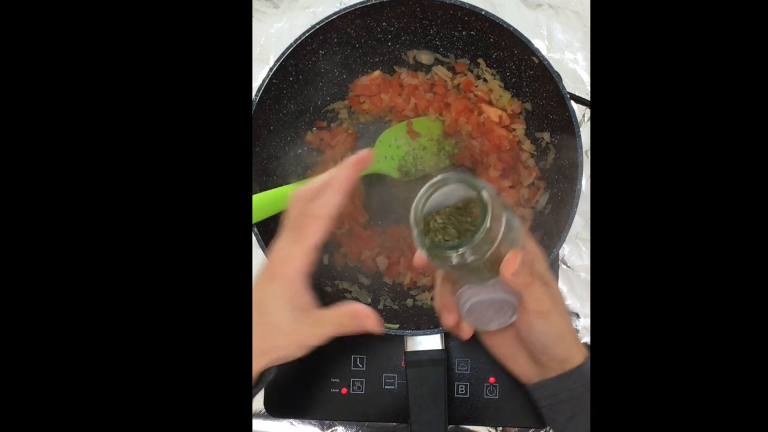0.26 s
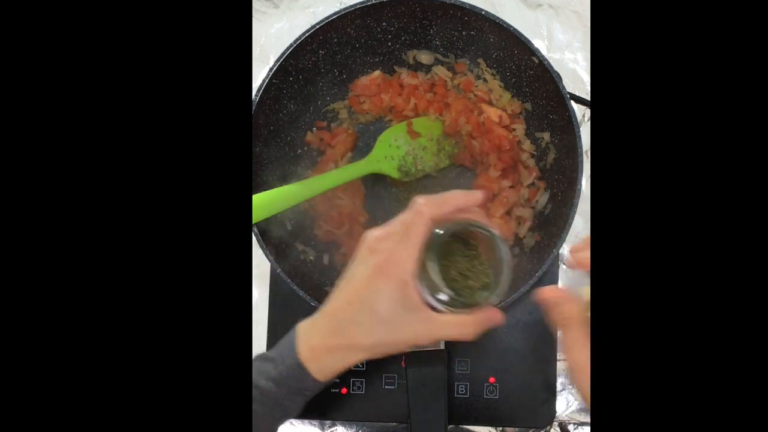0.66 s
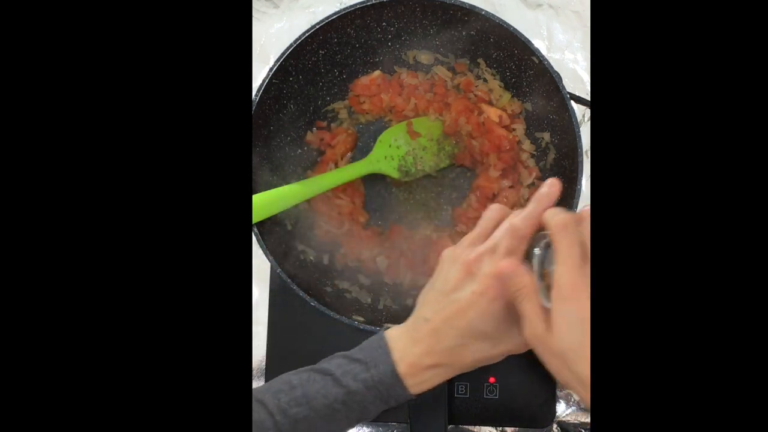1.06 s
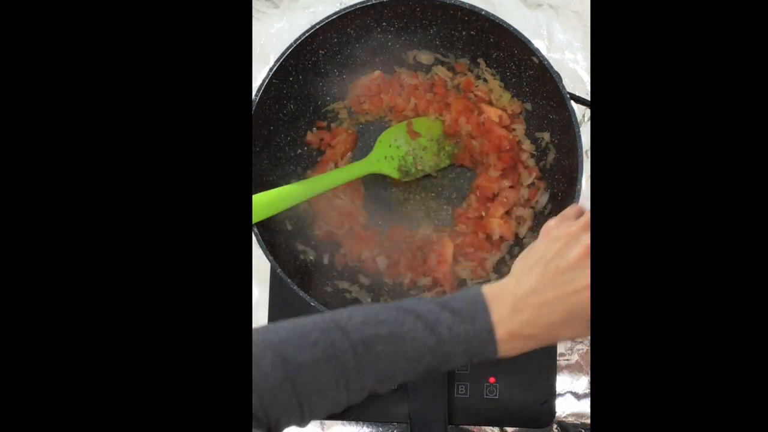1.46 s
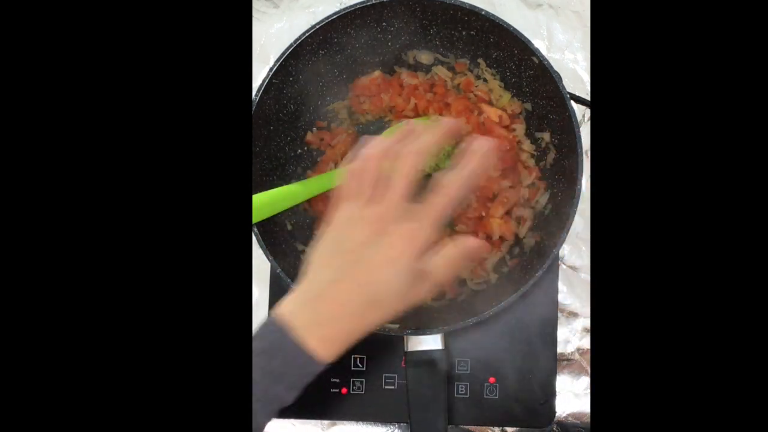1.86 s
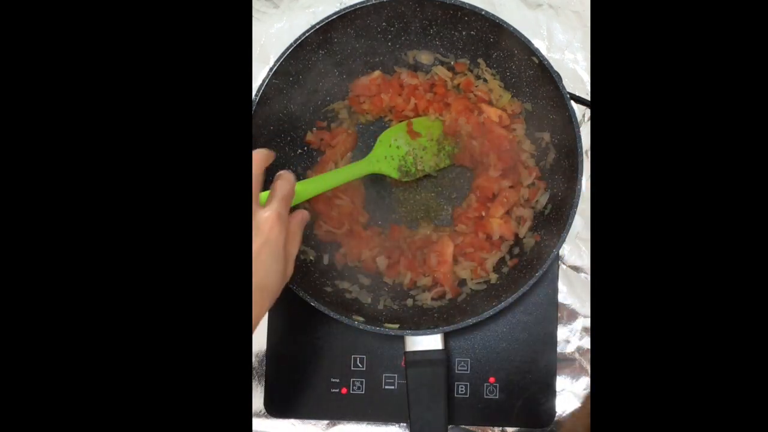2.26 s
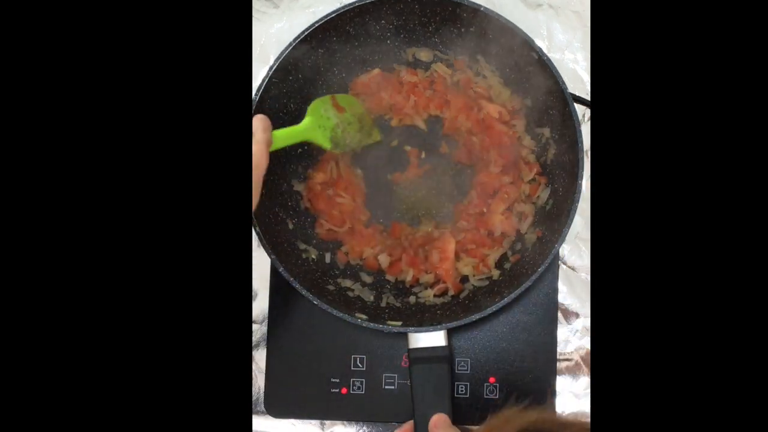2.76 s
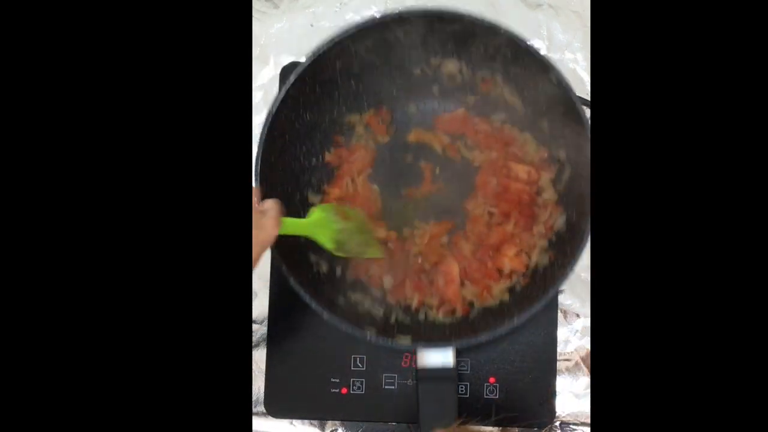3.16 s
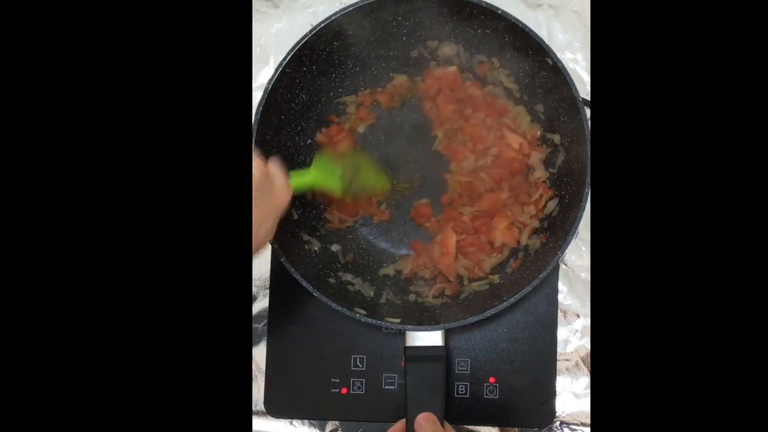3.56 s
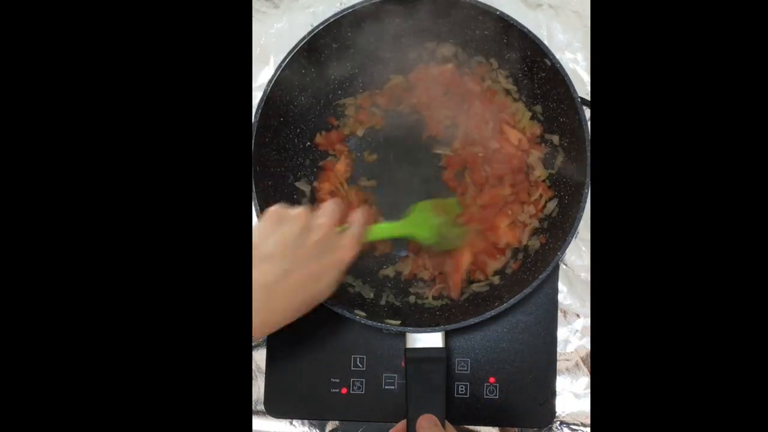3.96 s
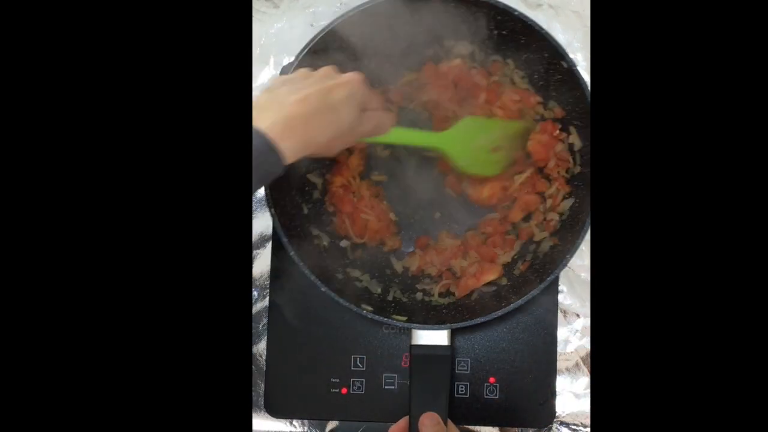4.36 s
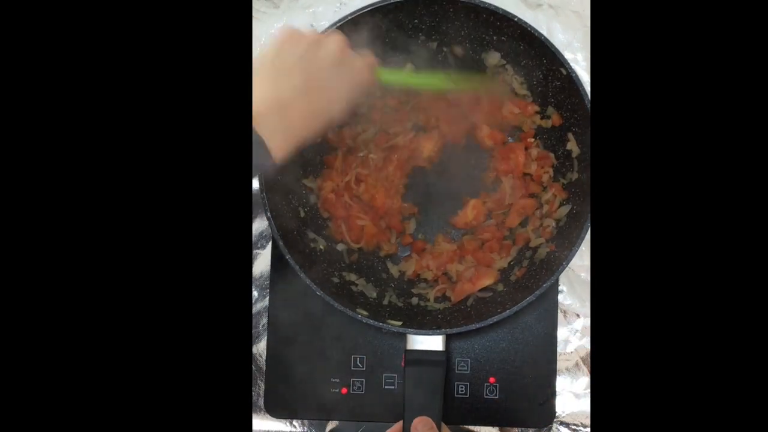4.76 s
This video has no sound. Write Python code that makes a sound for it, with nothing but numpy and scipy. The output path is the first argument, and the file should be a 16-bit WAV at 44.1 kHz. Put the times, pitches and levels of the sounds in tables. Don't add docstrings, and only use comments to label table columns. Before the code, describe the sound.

Steady low fan and soft simmering open the scene, with tiny pan taps. A small lid click comes first, then a loud foil crunch with glassy rattle, then quick clinks and a hard counter thud. Rapid hollow pan knocks and low sliding follow, then crackling, spitting sizzle. One close microphone in a small kitchen; background hiss is slightly patchy and dips after blows.

```python
import sys
import numpy as np
from scipy import signal
from scipy.io import wavfile
from scipy.ndimage import uniform_filter1d

SR = 44100
rng = np.random.default_rng(int(sys.argv[2]) if len(sys.argv) > 2 else 0)


def gain_from_decibels(decibels):
    exponent = np.asarray(decibels, float) / 20
    return 10 ** exponent


def log_audio(samples):
    frames = np.atleast_2d(samples).T
    limited = np.clip(frames, -1, 1)
    pcm = np.round(limited * 32767).astype(np.int16)
    wavfile.write(sys.argv[1], SR, pcm)


N = 221273
T = np.arange(N) / SR

# (frequency [Hz], density [dB per Hz])
ROOM_SPECTRUM = [(18, -46.5), (30, -15), (90, -9.5), (134, -13.5), (238, -13.5), (371, 3), (733, -10),
                 (1340, -3.5), (1650, -16.5), (2090, -0.5), (2260, -11), (2940, -8.5), (4350, -8),
                 (12700, -13), (15700, -18)]
# (frequency [Hz], level [dB rms])
FAN_TONES = [(68.5, -75.5), (137, -71.5), (206, -72.5), (274, -77)]
# (time [s], level [dB])
FAN_LOAD = [
    (0, 10.5),
    (1, 9.5),
    (2, 5.5),
    (2.6, 1),
    (3.6, -4.5),
    (5.02, 3),
]
# (time [s], level [dB])
SIMMER_LEVEL = [
    (0, -68.5),
    (1.6, -67.5),
    (2.8, -57.5),
    (3.1, -50),
    (3.5, -69),
    (4.5, -63),
    (5.02, -62.5),
]
# (frequency [Hz], level [dB], t60 [s])
PAN_MODES = [(162, -28.5, 0.14), (260, -15.5, 0.071), (368.6, -0.5, 0.062), (420.4, -1, 0.051),
             (610, -16, 0.03), (813, -23, 0.027)]
# (time [s], peak [dB], low side [dB])
PAN_ROCKS = [(0.123, -49, -23), (0.209, -48.5, -12), (0.431, -41, -26), (0.519, -44.5, -20),
             (2.815, -12.5, -27), (2.849, -31.5, -2), (2.874, -17.5, -32), (2.899, -21.5, -10),
             (2.924, -25, -21), (2.939, -28, 0.5), (2.967, -15, -33), (2.994, -25, -26), (3.027, -24, -11),
             (3.054, -22, -33), (3.079, -32.5, -8), (3.173, -32, -16), (3.244, -24, -31), (3.264, -25, -30),
             (3.309, -32.5, -24), (3.357, -38, -20), (3.441, -49.5, -1), (3.489, -42, -11)]
# (peak time [s], level [dB], release [s])
PAN_SHOVES = [
    (2.835, -51.5, 0.076),
    (2.9, -54, 0.055),
    (2.978, -37, 0.028),
    (3.04, -46.5, 0.052),
    (3.15, -51, 0.066),
    (3.2, -46.5, 0.056),
    (3.234, -44.5, 0.032),
    (3.3, -65, .04),
    (3.49, -54.5, 0.069),
]
# (frequency [Hz], level [dB], t60 [s])
LID_MODES = [(391.5, -1, 0.2), (522, -6, .07), (2290, -2.5, 0.058), (2886, -3, .08), (3140, 1, 0.12),
             (3350, 2, .09), (4900, -18, 0.028)]
# (frequency [Hz], density [dB per Hz])
LID_SPECTRUM = [(88, -60), (150, -27), (247, -14), (381, -6.5), (1350, -12.5), (3200, -6), (3720, -37.5),
                (5100, -43), (7360, -60), (8000, -39), (10400, -69), (17600, -120)]
# (frequency [Hz], density [dB per Hz])
FOIL_SPECTRUM = [(35, -60), (60, -27), (738, -6.5), (869, -7), (1120, -7), (1260, -6.5), (1630, -5.5),
                 (1960, -4), (4220, -1), (4740, -6), (7200, -1), (14500, -26), (15500, -32)]
# (frequency [Hz], t60 [s])
FOIL_T60 = [(100, 0.4), (700, 0.31), (3000, 0.3), (6000, 0.19), (10000, 0.21), (14000, 0.16)]
# (frequency [Hz], level [dB], t60 [s])
JAR_MODES = [(873.5, -16.5, 0.14), (2335, -10.5, .07), (3546, -8, 0.088), (4290, -11, 0.056),
             (7060, -4.5, 0.063), (7200, -5, .08), (7153, -3.5, .09), (7280, -7, 0.058), (8980, -9, 0.053),
             (14500, -14, .03)]
# (frequency [Hz], level [dB], t60 [s])
GLASS_MODES = [(920, -15.5, .1), (983, -13.5, 0.07), (1250, -8.5, .1), (1760, 3.5, .2), (1791, 2.5, 0.77),
               (2950, -2, 0.44), (4150, -15, .07), (4657, -2.5, 0.27), (4962, -1, 0.2), (5420, 1.5, 0.099),
               (5980, -6.5, .27), (7110, -5, 0.077), (8720, 0.5, 0.089), (8900, -7.5, 0.16),
               (11300, -17, .1), (11900, -10.5, 0.073), (12100, -11.5, .09), (12540, -17.5, .06),
               (13870, -27, .05), (15430, -13, .12)]
# (time [s], lower modes [dB], upper modes [dB], favoured upper mode [Hz])
GLASS_CLINKS = [
    (2.0772, -26, -22, 11800),
    (2.082, -14, -22, 15400),
    (2.101, -36, -31, 7100),
    (2.11773, -20, -37.5, 12000),
    (2.144, -38.5, -27.5, 5980),
    (2.15347, -19.5, -34.5, 8800),
    (2.128, -40, -31, 12600),
]
# (frequency [Hz], density [dB per Hz])
RATTLE_SPECTRUM = [(150, -6.5), (400, -7.5), (1200, 6.5), (5000, -7.5), (9000, -20), (15000, -30.5)]
# (frequency [Hz], level [dB], t60 [s])
COUNTER_MODES = [(210.8, -9.5, .35), (363.4, -6, 0.15), (499.4, -15.5, .15), (525, -11, .22),
                 (560, 8.5, 0.032), (562, -12, 0.2494), (860.7, -12, 0.46), (921, -16.5, 0.22),
                 (978, -16, 0.26), (1128, -16, 0.19), (1584, -14.5, 0.11)]
# (time [s], level [dB])
COUNTER_BLOWS = [
    (2.168, -21.5),
    (2.1791, -12),
    (2.181, -1.5),
    (2.194, -20),
    (2.207, -13.5),
    (2.221, -20),
]
# (frequency [Hz], density [dB per Hz])
THUMP_SPECTRUM = [(18, -80.5), (30, -46.5), (202, -2.5), (359, 0), (433, -16.5), (539, 1), (769, -2.5),
                  (865, -2), (1340, -14.5), (1700, 3.5), (2210, -18), (3740, -120)]
# (frequency [Hz], t60 [s])
THUMP_T60 = [(40, .3), (150, .45), (500, 0.46), (1500, 0.4)]
# (time [s], peak [dB], chirp [Hz])
SPITS = [
    (2.5773, -33, 6900),
    (2.6514, -23, 9750),
    (3.0746, -33, 7110),
    (3.5002, -18, 12700),
    (3.582, -28, 8120),
    (3.6472, -11, 11100),
    (3.9023, -34.5, 7060),
    (3.9314, -26, 5820),
    (4.3442, -24.5, 11100),
    (4.91, -24.5, 6400),
]
# (frequency [Hz], density [dB per Hz])
SIZZLE_SPECTRUM = [(410, -25.5), (700, -22), (1340, -13), (1670, -8.5), (2030, -12), (2350, -2),
                   (2930, -10), (3380, -2.5), (5060, -5.5), (5690, -2.5), (7380, -2.5), (11000, -4),
                   (15700, -6)]
# (time [s], level [dB], tilt [dB per octave])
FRYING = [(0, -56.5, -2.5), (1.3, -55.5, -1.5), (1.6, -52.5, -3.5), (1.85, -52, -3.5), (2.06, -60.5, -3.5),
          (2.4, -56.5, -5), (2.6, -51, -2), (3.0, -53, -3), (3.1, -42, -0.5), (3.38, -41, -1),
          (3.62, -36.5, 0.5), (3.76, -37, -1), (3.88, -59, -1.5), (3.94, -44.5, -1), (4.12, -43, -2.5),
          (4.5, -43, -3), (4.66, -39, -2.5), (5.02, -42.5, -4)]
# (peak time [s], level [dB], release [s], centre [Hz])
FLARES = [(1.72, -48, .06, 11040), (2.65, -46, .02, 10000), (2.9, -48.5, 0.033, 7000),
          (3.17, -34, 0.034, 2320), (3.24, -38, .05, 6950), (3.3, -37, .04, 4520), (3.46, -30, 0.033, 1700),
          (3.5, -32, 0.066, 12370), (3.66, -34, 0.033, 6910), (3.66, -32, 0.064, 4280),
          (3.735, -29, 0.058, 3600), (3.71, -30.5, 0.045, 12000), (3.968, -22, 0.061, 11200),
          (3.955, -25.5, 0.05, 6470), (4.0, -32, 0.091, 2340), (4.02, -31, 0.073, 10400),
          (4.075, -32, 0.037, 5800), (4.37, -39.5, 0.1, 12000), (4.66, -37.5, 0.097, 4530),
          (4.78, -33.5, 0.14, 4200), (4.95, -35.5, 0.078, 5850)]
# (frequency [Hz], width [Hz], level, not used [dB])
WALL_MODES = [(1693, 36, -8), (4520, 190, -5), (5810, 53, -4), (6470, 56, -6), (8040, 29, -6),
              (9570, 630, -4), (10880, 63, -3), (11380, 53, 0), (12700, 79, -2), (12500, 67, -3),
              (12700, 39, -4), (13830, 140, -8)]


def rms_one(x):
    return x / np.sqrt(np.mean(x ** 2) + 1e-20)


def in_time(rows):
    s, *columns = np.transpose(rows)
    return [np.interp(T, s, c) for c in columns]


def at_hz(points, hz):
    table_hz, values = np.transpose(points)
    return np.interp(np.log(hz), np.log(table_hz), values)


def drift(rate_hz):
    r = np.exp(-80 * np.pi * rate_hz / SR)
    white = rng.standard_normal(N // 40 + 2002)
    slow = signal.lfilter([1], [1, -2 * r, r * r], white)[2000:]
    return np.interp(np.arange(N) / 40, np.arange(len(slow)), rms_one(slow))


def ring(clicks, hz, t60_s, rise_s=1e-4):
    w, touched = 2 * np.pi * hz / SR, np.flatnonzero(clicks)
    span = slice(touched[0], touched[-1] + 3 * SR // 4)
    r, quick = gain_from_decibels(-60 / (t60_s * SR)), np.exp(-1 / (rise_s * SR))
    push = signal.lfilter([1, 0, -1], [1], clicks[span]) + 1e-18
    swell = signal.lfilter([(1 - quick ** 2) / 2], [1, -2 * quick * np.cos(w), quick ** 2], push)
    out = np.zeros(N)
    out[span] = signal.lfilter([0, np.sin(w)], [1, -2 * r * np.cos(w), r * r], swell)
    return out


def clicks_at(times_s, db):
    out = np.zeros(N)
    out[np.round(np.asarray(times_s) * SR).astype(int)] = gain_from_decibels(np.asarray(db))
    return out


def strike(clicks, modes, rise_s):
    out = 0
    for k, (hz, db, t60_s) in enumerate(modes):
        out = out + (-1) ** k * gain_from_decibels(db) * ring(clicks, hz, t60_s, rise_s)
    return out


def bands(spectrum, white, count):
    edges = np.geomspace(spectrum[0][0], 1.05 * spectrum[-1][0], count + 1)
    hz = np.sqrt(edges[1:] * edges[:-1])
    gain = gain_from_decibels(at_hz(spectrum, hz))
    gain = gain / np.sqrt(2 * np.sum(gain ** 2 * np.diff(edges)) / SR)
    for k in range(count):
        band_pass = signal.butter(2, edges[k:k + 2], "band", fs=SR, output="sos")
        yield hz[k], gain[k] * signal.sosfilt(band_pass, white[k % 2])


def grains(per_s, spread_db, size=N):
    uneven_db = spread_db * np.minimum(rng.exponential(1, (2, size)), 5)
    ticks = gain_from_decibels(uneven_db) * rng.choice([-1, 1], (2, size))
    return rms_one(ticks * (rng.random((2, size)) < per_s / SR))


def burst(start_s, rise_s, db, spectrum, t60s, per_s, spread_db):
    out, t, first = np.zeros(N), T[:SR // 2], round(start_s * SR)
    swell = np.clip(t / rise_s, 0, 1) ** 2
    for hz, band in bands(spectrum, grains(per_s, spread_db, size=len(t)), count=20):
        fall_db = 60 * np.maximum(t - rise_s, 0) / at_hz(t60s, hz)
        out[first:first + len(t)] += gain_from_decibels(db - fall_db) * swell * band
    return out


def swells(peak_s, db, release_s, rise, t):
    x = (t - peak_s[:, None]) / release_s[:, None]
    return gain_from_decibels(db)[:, None] * np.exp(-np.where(x < 0, (x / rise) ** 2, x))


def kitchen(x, db, t60_s):
    t = T[:SR // 3]
    tail = rng.standard_normal(len(t)) * gain_from_decibels(-60 * t / t60_s) * (t > 0.003)
    return x + gain_from_decibels(db) * signal.fftconvolve(x, tail / np.sqrt(np.sum(tail ** 2)))[:N]


def by_bin(x, gain_for):
    spec = signal.stft(x, nperseg=1024, noverlap=768)[2]
    power = uniform_filter1d(np.abs(spec) ** 2, size=3, axis=-1) + 1e-16
    return signal.istft(spec * gain_for(power), nperseg=1024, noverlap=768)[1][..., :N]


def cut_tail(x, knee_db):
    return by_bin(x, lambda power: power ** 2 / (power ** 2 + gain_from_decibels(knee_db) ** 4))


def suppress(x, depth_db=-4.0, strength=0.6, memory_s=0.23):
    r = np.exp(-256 / SR / memory_s)

    def gain(power):
        start = np.log(power[..., :40]).mean(axis=-1, keepdims=True)
        recent = np.exp(start + signal.lfilter([1 - r], [1, -r], np.log(power) - start))
        return np.maximum(1 - strength * recent / power, gain_from_decibels(depth_db))
    return by_bin(x, gain)


def hob_fan():
    load_db = in_time(FAN_LOAD)[0]
    hiss = 0
    for hz, band in bands(ROOM_SPECTRUM, rng.standard_normal((2, N)), count=24):
        hiss = hiss + band * gain_from_decibels(2.4 * drift(6.5) + 0.45 * load_db * (hz < 180))
    tones = sum(gain_from_decibels(db + 1.1 * drift(3.0)) * np.sin(2 * np.pi * hz * T) for hz, db in FAN_TONES)
    return gain_from_decibels(-53.0) * hiss + gain_from_decibels(load_db - 3.0) * tones


def simmer():
    bubbles = grains(60.0, spread_db=2.5)[0]
    return rms_one(strike(bubbles, PAN_MODES[1:4], rise_s=0.0044)) * gain_from_decibels(in_time(SIMMER_LEVEL)[0])


def pan_rocking():
    s, db, low_db = np.transpose(PAN_ROCKS)
    taps = strike(clicks_at(s, db - 1.5), PAN_MODES[2:], rise_s=0.0012)
    low_pushes = strike(clicks_at(s, db + low_db + 17.0), PAN_MODES[:2], rise_s=0.0034)
    return kitchen(taps + low_pushes, db=-5, t60_s=0.14)


def pan_sliding():
    low_band = signal.butter(3, [60, 200], "band", fs=SR, output="sos")
    rumble = signal.sosfilt(low_band, rng.standard_normal(N))
    return rms_one(rumble) * swells(*np.transpose(PAN_SHOVES), 0.25, T).sum(axis=0)


def lid():
    snap = strike(clicks_at([0.8800, 0.8817, 0.886], [-38, -24, -32]), LID_MODES, rise_s=0.00055)
    return snap + burst(0.880, 0.0032, -30.0, LID_SPECTRUM, [(300, 0.24), (3000, 0.16)], 8000.0, spread_db=2.5)


def jar():
    jolts = grains(1500.0, spread_db=2.2)[0]
    shake_db = -36 - 60 * np.maximum(T - 1.384, 0) / 0.27
    shake = jolts * (T > 1.384) * (T < 1.7) * gain_from_decibels(shake_db)
    crunch = burst(1.370, 0.019, -10, FOIL_SPECTRUM, FOIL_T60, 9000.0, spread_db=2.5)
    return crunch + strike(shake + clicks_at([1.387], [-26]), JAR_MODES, rise_s=0.00081)


def glass():
    s, lower_db, upper_db, spot_hz = np.transpose(GLASS_CLINKS)
    favour_db, favour_octaves = 11.5, 0.037
    rings = 0
    for hz, mode_db, t60_s in GLASS_MODES:
        touch_db = lower_db
        if hz > 4000:
            touch_db = upper_db + favour_db * np.exp(-(np.log2(hz / spot_hz) / favour_octaves) ** 2)
        rings = rings + gain_from_decibels(mode_db) * ring(clicks_at(s, touch_db), hz, t60_s, rise_s=0.00077)
    rings = cut_tail(kitchen(rings, db=-11, t60_s=0.2), knee_db=-45.5)
    return rings + burst(2.075, 0.008, -21.5, RATTLE_SPECTRUM, [(500, 0.38), (8000, 0.28)], 6600.0, spread_db=3.0)


def thump():
    s, db = np.transpose(COUNTER_BLOWS)
    knock = strike(clicks_at(s, db - 2.5), COUNTER_MODES, rise_s=0.00079)
    contact = ring(clicks_at(s, db - 3.5), 1500.0, t60_s=0.0066)
    return knock + contact + burst(2.179, 0.004, -13.5, THUMP_SPECTRUM, THUMP_T60, 2500.0, spread_db=2.0)


def spits():
    return sum(ring(clicks_at([s], [db - 0.5]), hz, 60.0 / hz, rise_s=0.0006) for s, db, hz in SPITS)


def sizzle(db=-0.15, patchy_db=3.5, flutter_db=0.29):
    out, shared, t = 0, drift(34.0), T[::64]
    level_db, tilt_db = (c[::64] for c in in_time(FRYING))
    s, flare_db, release_s, centre_hz = np.transpose(FLARES)
    flare_power = swells(s, flare_db, release_s, 0.62, t) ** 2
    for hz, band in bands(SIZZLE_SPECTRUM, grains(12000.0, spread_db=2.0), count=40):
        near = np.exp(-(np.log2(hz / centre_hz) / 0.31) ** 2)
        frying = gain_from_decibels(level_db + tilt_db * np.log2(hz / 8000))
        level = np.sqrt(frying ** 2 + near @ flare_power)
        out = out + band * np.interp(T, t, level) * gain_from_decibels(patchy_db * drift(12.3) + flutter_db * shared)
    return gain_from_decibels(db) * out


def pan_wall(hiss, db=-1.5, wander_db=4.0):
    out = hiss.copy()
    for hz, width_hz, _ in WALL_MODES:
        r = np.exp(-np.pi * np.clip(width_hz, 80, 250) / SR)
        poles = [1, -2 * r * np.cos(2 * np.pi * hz / SR), r * r]
        sung = signal.lfilter([(1 - r * r) / 2, 0, (r * r - 1) / 2], poles, hiss)
        out += gain_from_decibels(db + wander_db * drift(4.0)) * sung
    return out


def scene():
    background = hob_fan() + simmer()
    blows = cut_tail(jar() + thump(), knee_db=-64) + glass()
    pan_moves = pan_rocking() + pan_sliding()
    return (background + lid() + blows + pan_moves + spits() + pan_wall(sizzle()))[None]


def band_limit(x):
    return signal.sosfilt(signal.butter(12, 15850, fs=SR, output="sos"), x)


def record(dry):
    x = signal.sosfilt(signal.butter(2, 70.0, "high", fs=SR, output="sos"), suppress(dry))
    x = signal.sosfilt(signal.cheby2(14, 60, 15950, fs=SR, output="sos"), x)
    return band_limit(np.clip(x, -1, 1))


dry = scene()
out = record(dry)
log_audio(out)
```